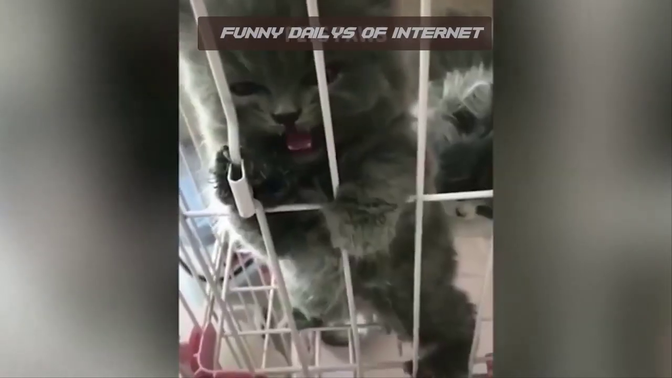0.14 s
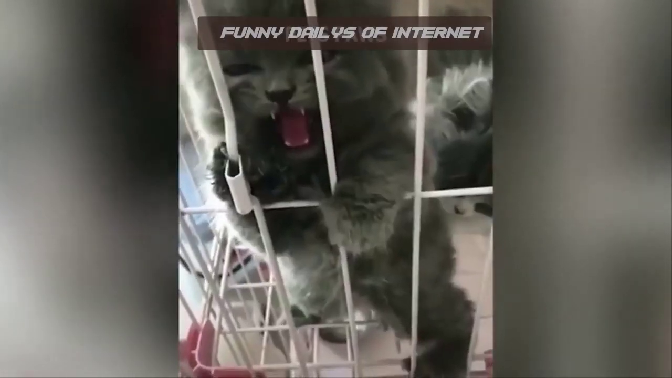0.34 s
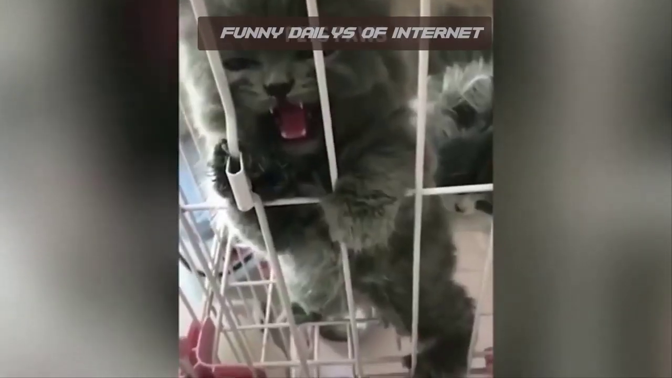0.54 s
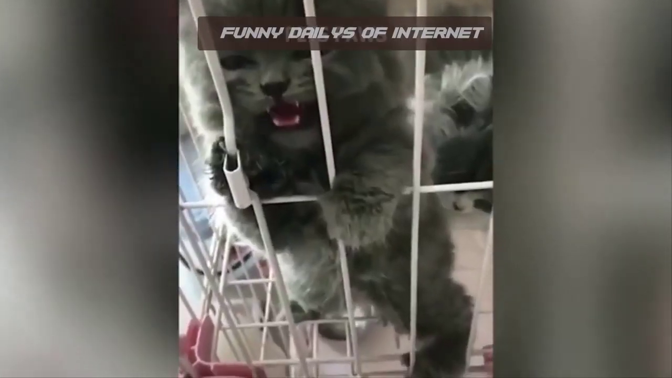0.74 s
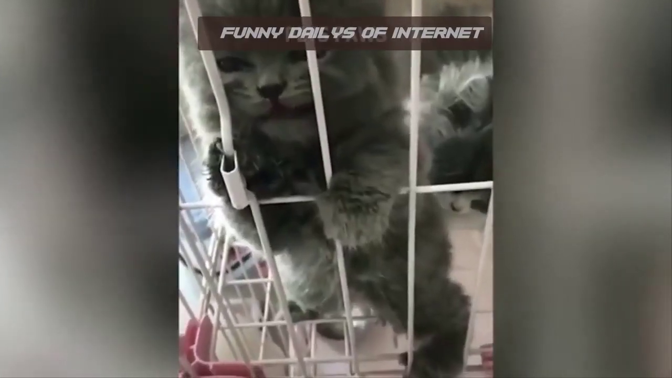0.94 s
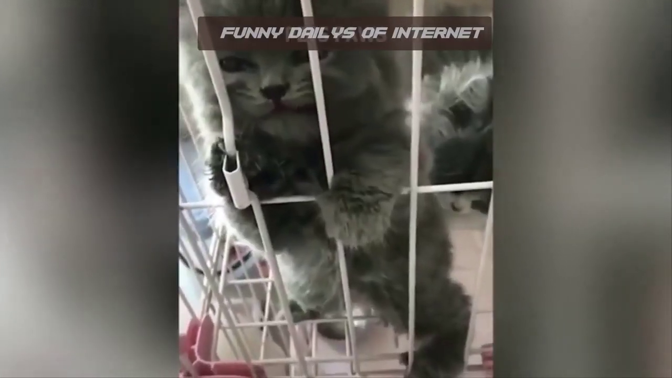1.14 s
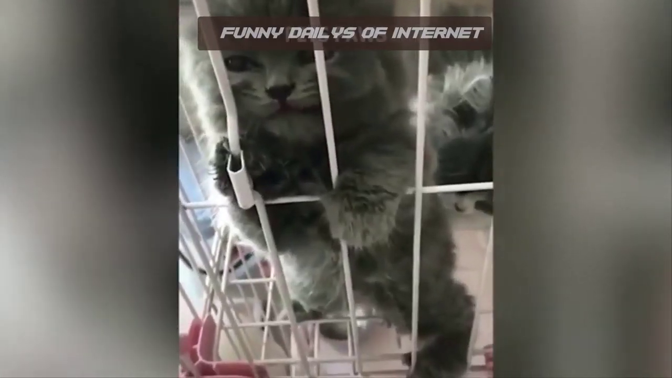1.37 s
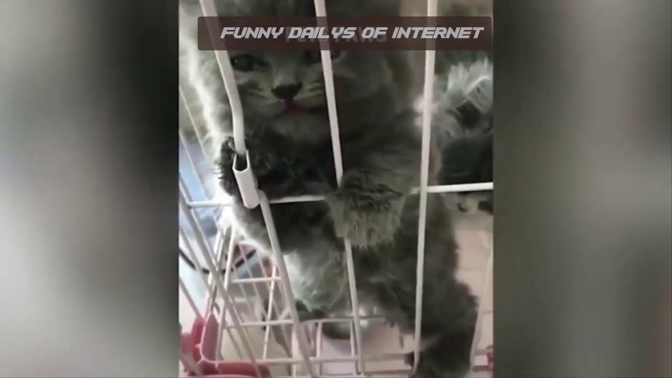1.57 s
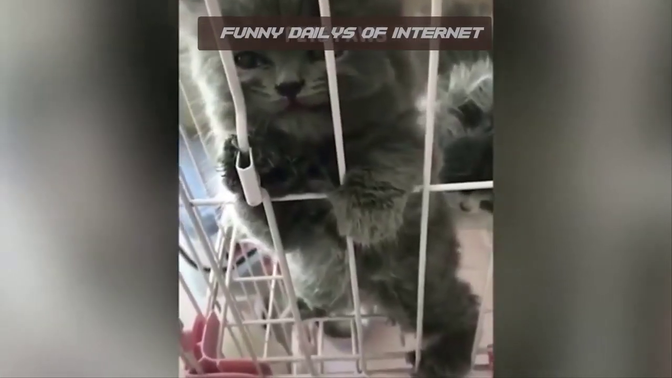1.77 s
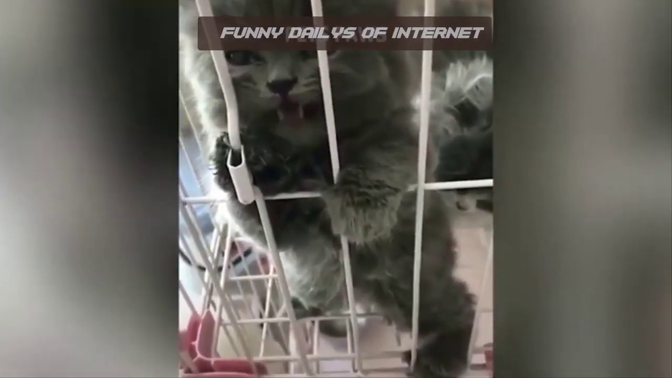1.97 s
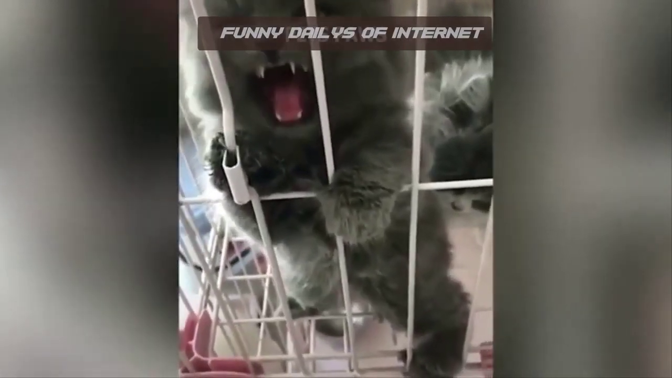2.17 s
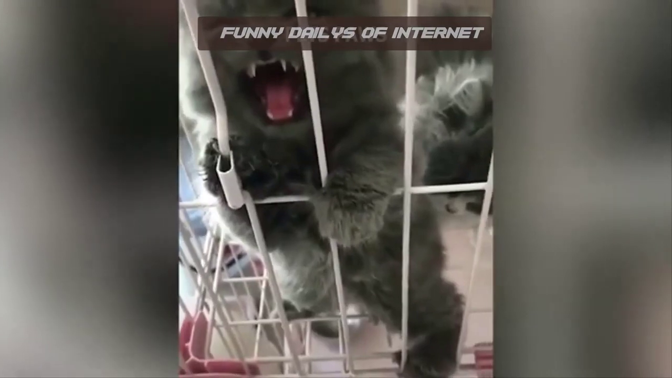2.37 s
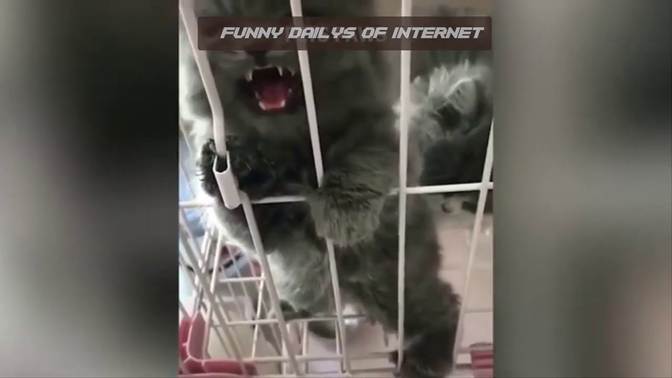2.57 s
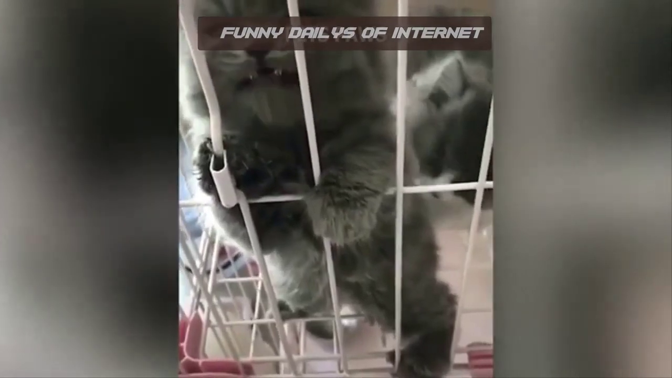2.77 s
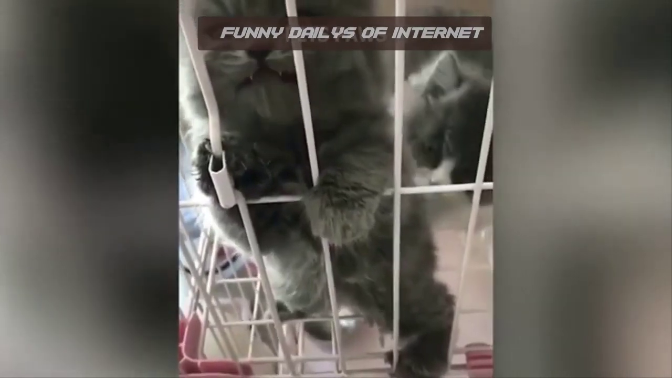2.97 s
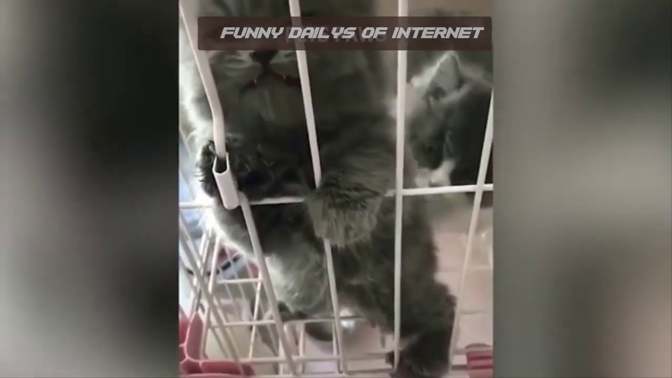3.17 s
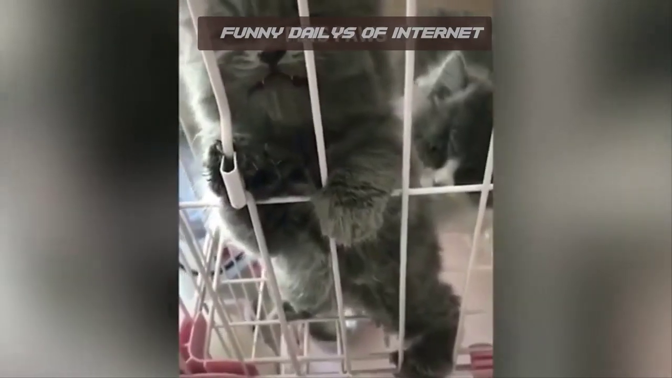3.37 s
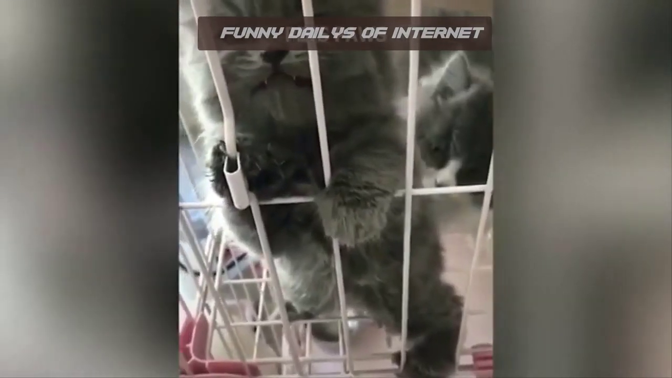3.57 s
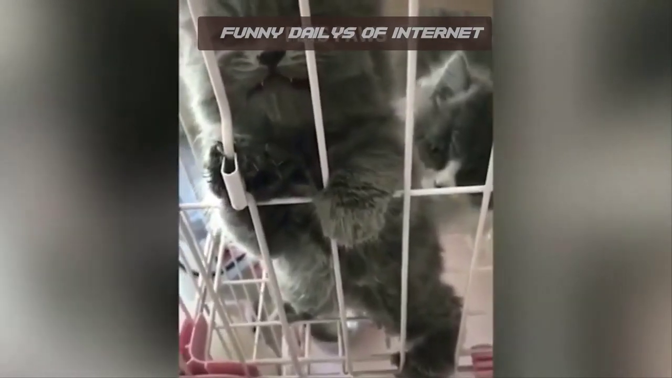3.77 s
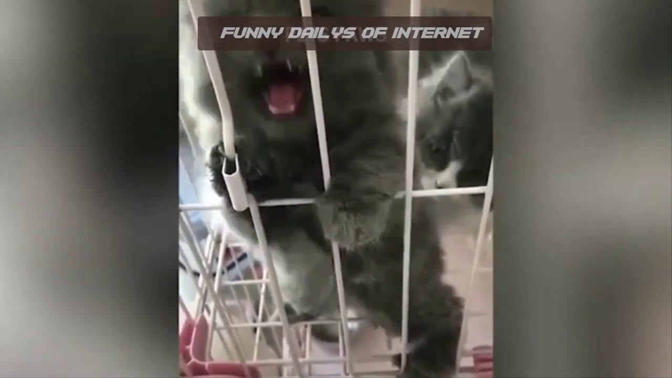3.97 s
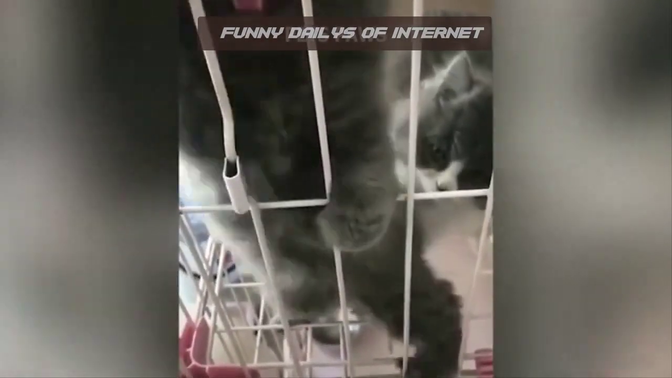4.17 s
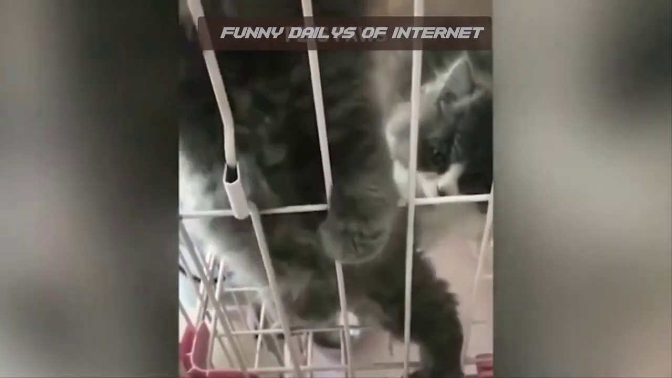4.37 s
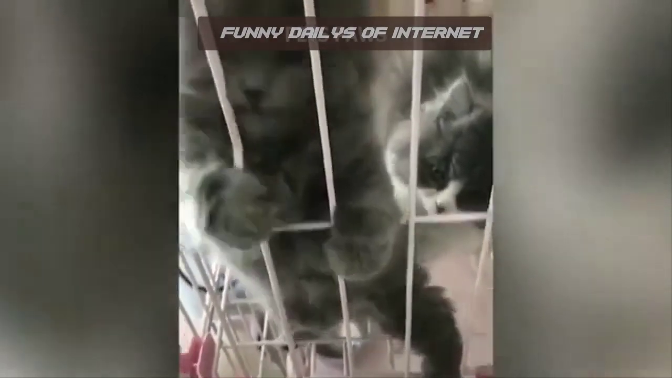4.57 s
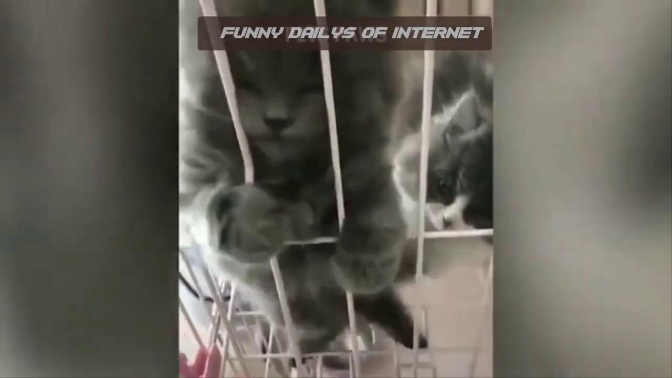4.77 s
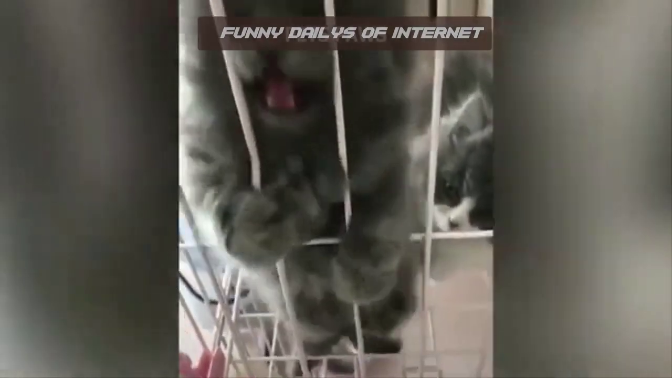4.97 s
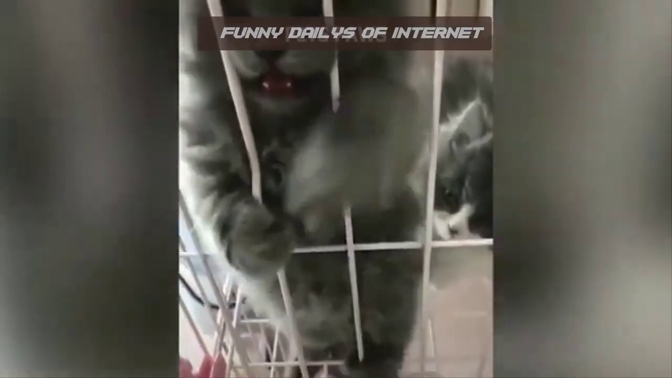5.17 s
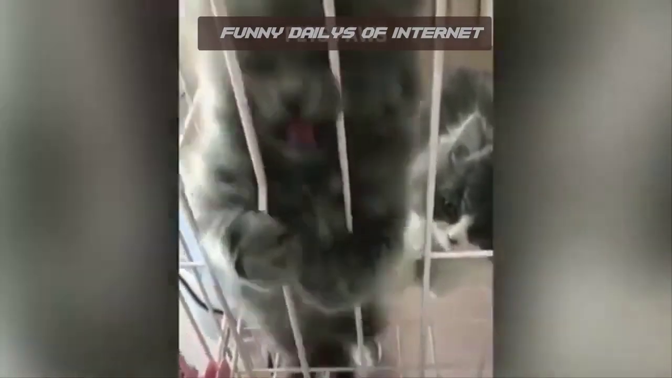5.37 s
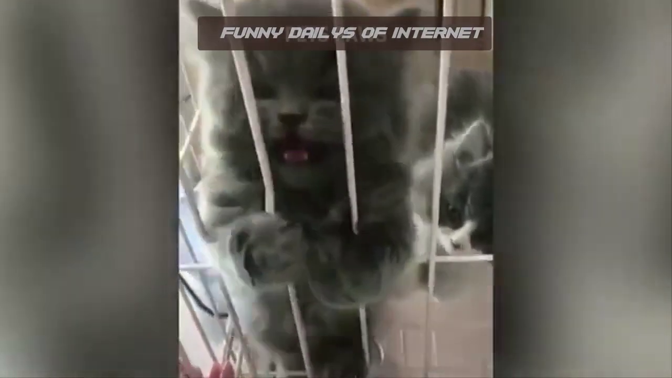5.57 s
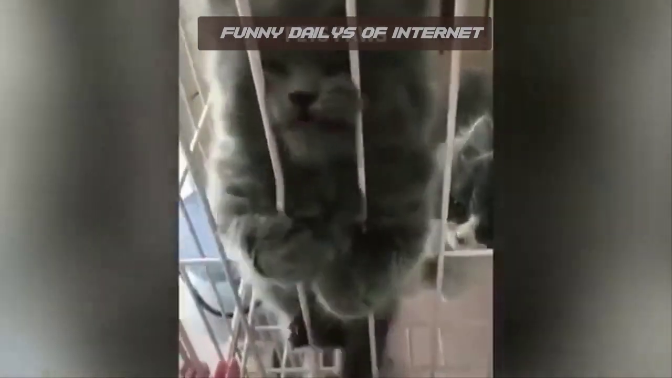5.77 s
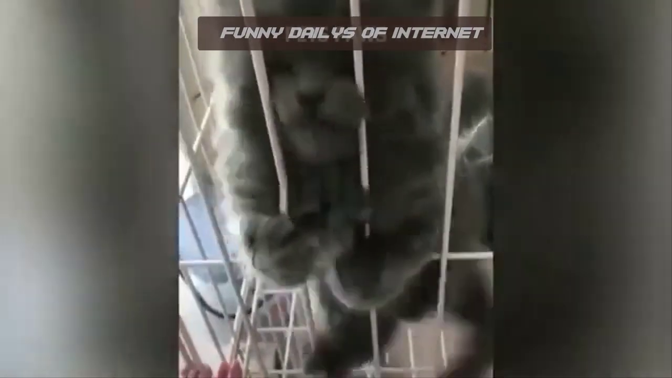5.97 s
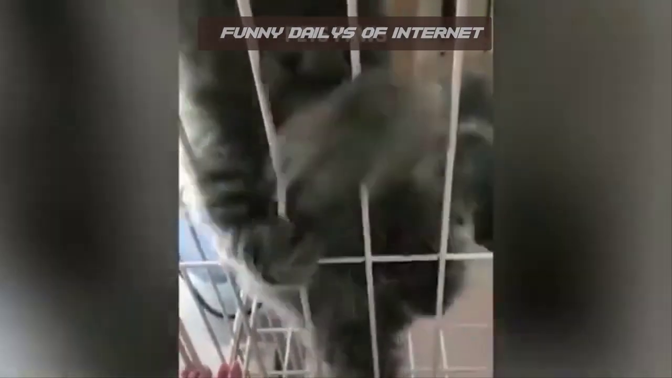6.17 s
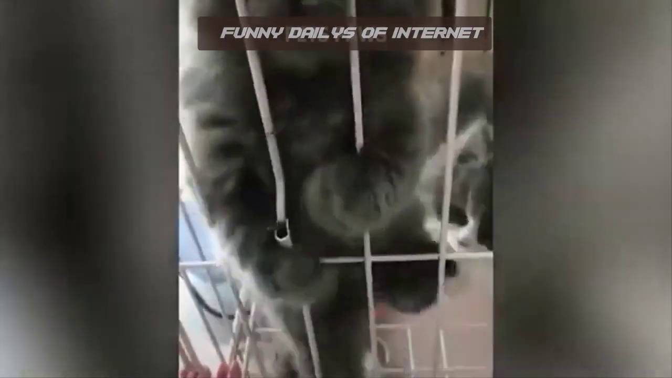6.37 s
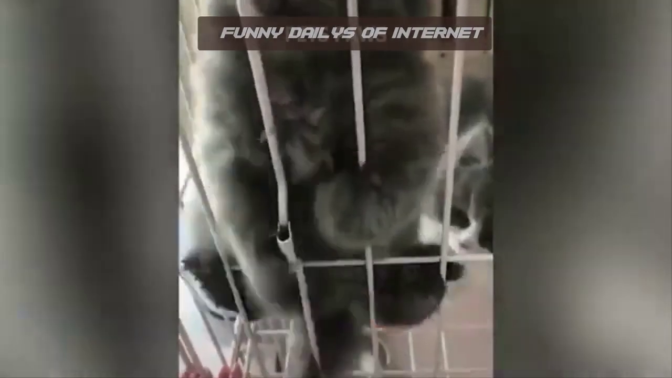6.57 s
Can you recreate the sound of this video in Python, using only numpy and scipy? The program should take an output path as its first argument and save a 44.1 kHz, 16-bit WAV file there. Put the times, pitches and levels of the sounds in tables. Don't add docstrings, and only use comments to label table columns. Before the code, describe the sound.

Low street rumble seeps through a wall into a small room. A kitten meows hoarsely, waits, meows brighter and sharper, then after another pause gives its highest, roughest cry and quickly a clearer one that starts low. Small wet mouth clicks and breathy puffs edge the cries. An engine hums upward faintly outside. Light scratchy rustling on cage wire follows. Close, dry, small microphone with slightly thin treble.

```python
import sys
import numpy as np
from scipy import signal
from scipy.fft import rfft, irfft
from scipy.io import wavfile
from scipy.ndimage import uniform_filter1d, minimum_filter1d

SR = 44100
rng = np.random.default_rng(int(sys.argv[2]) if len(sys.argv) > 2 else 0)


def rack_gain(trim_db):
    fader = np.asarray(trim_db, float)
    return 10 ** (fader / 20)


def put_to_file(sound):
    columns = np.atleast_2d(sound).T
    safe = np.clip(columns, -1, 1)
    whole_steps = np.round(safe * 32767)
    wavfile.write(sys.argv[1], SR, whole_steps.astype(np.int16))


N = 292824

# t/s, voice level/dB, jaw opening as mouth resonance lift/dB,
# tongue forward as lip resonance lift/dB, mouth f/Hz
MOUTH_1 = [(.348, -47.5, -63, -15, 3500), (.39, -45.5, -14, 11.5, 4050), (.456, -37.5, 2.5, -11, 4020),
           (.544, -32.5, -8, 2.5, 4500), (.636, -32, -1.5, -7.5, 3960), (.76, -35, -5.5, -4, 3800),
           (.86, -33, -5.5, -10.5, 3084), (1.088, -36, -17.5, -20, 4656), (1.12, -31, -16, -20, 4150)]
MOUTH_2 = [(2.161, -46, -5, -6, 3530), (2.204, -30.5, -7, -2.5, 3340), (2.253, -30.5, 13.5, -12, 3920),
           (2.322, -32.5, 17, -6.5, 3940), (2.47, -34, 9.5, -7.5, 4090), (2.6, -32, -2.5, -11.5, 3734),
           (2.66, -38, 2.5, -9, 3940), (2.766, -33, -4, -14, 3280), (2.824, -26, -6, -7, 3200)]
MOUTH_3 = [(4.022, -40.5, -11.5, 2, 3300), (4.078, -27, 5.5, -12, 3540), (4.111, -33.5, 21, -5.5, 4040),
           (4.184, -28.5, 13.5, 2.5, 3930), (4.284, -34, 14, -6.5, 3670), (4.455, -35, -8.5, -3.5, 3730),
           (4.509, -36, -3, -1, 3860), (4.558, -39.5, -1, -18, 3256), (4.59, -41, 2, 9, 3200)]
MOUTH_4 = [(4.895, -46.5, -32, 2, 3080), (4.927, -30, -34, -23, 3050), (4.973, -44, -3.5, -3.5, 3420),
           (5.051, -35.5, -9.5, 10.5, 3170), (5.16, -39, -5, -3.5, 3750), (5.362, -33, -5.5, -8, 3050),
           (5.44, -30, -1.5, -10.5, 3150), (5.552, -34.5, -8, 0.5, 3830),
           (5.704, -33.5, -10.5, -13.5, 3330)]
# t/s, pitch f/Hz
MELODIES = [
    [(0.358, 783), (0.388, 858), (0.462, 884), (0.594, 817), (0.672, 759.3), (0.87, 710), (1.022, 694.6),
     (1.048, 785), (1.115, 742)],
    [(2.188, 678), (2.228, 833), (2.248, 940), (2.3, 984.5), (2.44, 919.5), (2.528, 841.6), (2.574, 824),
     (2.646, 781), (2.8, 633)],
    [(4.041, 643), (4.093, 920), (4.131, 1015), (4.289, 936.7), (4.345, 894), (4.373, 851), (4.489, 799.4),
     (4.519, 724.6), (4.575, 699)],
    [(4.914, 519), (4.994, 832), (5.068, 886), (5.262, 815.6), (5.424, 782), (5.5, 808), (5.575, 805),
     (5.642, 731), (5.695, 561)],
]
# fundamental level/dB, release/s, top level/dB, time until top is full/s, hoarseness level/dB
VOICES = [
    (-29.5, 0.033, -28.5, 0.1, 4),
    (-32.5, 0.059, -23.5, .03, 2.5),
    (-33, 0.029, -27.5, .03, 5),
    (-29, 0.014, -26.5, 0.19, -3),
]
# start t/s, end t/s, noise level re tone/dB
RASPS = [(.34, .40, -14), (.42, .44, -20), (.70, .78, -20), (.975, 1.02, -11), (1.015, 1.05, -5),
         (1.09, 1.13, -5), (2.14, 2.195, 3), (2.195, 2.245, -12), (2.52, 2.6, -23), (2.62, 2.68, -21),
         (2.775, 2.84, 8), (4.0, 4.048, 5), (4.048, 4.105, -12), (4.33, 4.42, -22), (4.495, 4.53, -6),
         (4.555, 4.6, -2), (4.89, 4.965, -5), (4.965, 5.0, -8), (5.27, 5.32, -22), (5.37, 5.47, -21),
         (5.64, 5.72, -11)]
# t/s, peak level/dB, f/Hz
SMACKS = [
    (0.4294, -30, 4270),
    (1.0302, -53.5, 4540),
    (4.5121, -25.5, 3850),
    (4.9846, -33.5, 5970),
    (5.0484, -29.5, 4300),
    (5.6869, -32.5, 3920),
]
# t/s, peak level/dB, f/Hz
CREAKS = [
    (0.359, -36, 900),
    (1.095, -35, 1090),
    (1.104, -34.5, 644),
    (2.784, -32.5, 1164),
    (2.797, -31, 1377),
    (2.81, -40, 617),
    (2.88, -43, 1390),
    (4.574, -46, 829),
    (5.692, -38, 535),
]
# delay t/s, level/dB
ECHOES = [(.0011, -26.5), (.0027, -23.5), (.0046, -22.5)]
# t/s, level/dB, t60/s, dull part level/dB
RUSTLES = [(1.105, -38, 0.16, -71), (2.8, -36, 0.23, -60), (4.575, -40, 0.66, -69),
           (5.689, -36.5, 0.24, -56), (2.8797, -44, 0.38, -47), (5.78, -35.5, 0.22, -53),
           (5.9, -60, 1.5, -80), (6.0209, -56, 0.29, -64.5), (6.1344, -57, 0.2, -64),
           (6.175, -46, 0.24, -54.5), (6.2984, -65.5, 0.37, -63), (6.3834, -37.5, 0.41, -56.5),
           (6.429, -55.5, 0.26, -52)]
# f/Hz, level per Hz/dB
RUSTLE_COLOUR = [(1060, -30), (1800, -12), (2420, 1), (3400, -6.5), (4290, 0), (4860, -15), (5970, -9.5),
                 (7720, -19), (13000, -24)]
# t/s, firing f/Hz, level/dB
ENGINE = [(.6, 44.55, -77), (.95, 45.42, -66), (1.47, 49.92, -61), (2.3, 54.42, -73.5), (2.69, 57.8, -65.5),
          (3.0, 60, -61.5), (3.46, 63.14, -60), (3.95, 66.16, -62), (4.3, 67.06, -71), (4.7, 70.9, -59.5),
          (5.3, 72.5, -99)]
# multiple of firing rate, level/dB
ENGINE_ORDERS = [(1, 3.5), (2, -0.5), (2.5, -9), (3, -6.5), (5, -14.5)]
# f/Hz, width f/Hz, lift level/dB
WALL_MODES = [(60, 8.2, 16.5), (129, 8.3, 5.5), (157.5, 20, 18.5), (320, 25, 8)]
# f/Hz, width f/Hz (unused), level/dB
HORN = [(2350, 20, -15), (2960, 34, 4), (3360, 35, -10), (4210, 34, -10), (5200, 82, -27.5)]
# t/s, level/dB
HORN_LEVEL = [
    (1.78, -106),
    (1.81, -70.5),
    (1.95, -68.5),
    (2.17, -73),
    (2.22, -87),
]
# t/s, level/dB
RUMBLE = [(0.0, -50.5), (1.09, -51.5), (2.4, -51.5), (3.12, -49.5), (3.9, -50.5), (4.4, -55.5), (4.64, -51),
          (4.86, -54.5), (5.5, -52), (6.64, -50)]
# f/Hz, level per Hz/dB
RUMBLE_COLOUR = [(12, -44), (20, -11.5), (33, -10), (51, 9), (75, -4.5), (97, -4), (118, -5.5), (265, -10),
                 (443, -21), (500, -22), (650, -28), (1100, -120)]
# f/Hz, level per Hz/dB
AIR_COLOUR = [(240, -33), (400, -9), (640, -6), (687, -5.5), (1180, -3.5), (1470, -8.5), (2600, -21),
              (3380, -53), (5720, -120)]
# f/Hz, level per Hz/dB
HISS_COLOUR = [(1060, -31), (1800, -8), (2530, -8), (2810, -6.5), (3160, -8), (4360, -12), (4700, -15),
               (13000, -22)]

THROAT_SHARPNESS, MOUTH_WIDTH_HZ, LIP_WIDTH_HZ = 1.31, 1625, 1800
LIP_HZ, LIP_HZ_PER_DB = 5857, 45
TOP_HZ, TOP_WIDTH_HZ, TOP_START_DB = 12200, 8000, -30
TOP_FOLLOWS_MOUTH, TOP_FOLLOWS_TONGUE, TOP_DB_PER_OCTAVE, MID_PITCH_HZ = 0.46, 0.28, 13, 787
LOUD_DB, FUNDAMENTAL_FOLLOWS = -31, 0.61
SLACK_HZ, SLACK_SPREAD_HZ, SLACK_TOP_DB = 750, 12, -6.5
SHUT_DB, SHUT_TOP_LOSS = -12, 1
ATTACK_S, EDGE_DB = .01, -27
NASAL_HZ, NASAL_WIDTH_HZ, NASAL_LEFT_DB = 3200, 240, -8
BREATH_DB = -25.5
ROOM_T60_S, ROOM_DB = .45, -27
SWELL_S, RUSTLE_LOSS_DB = .014, -13
LINGER_DB, LINGER_FOLLOWS, LINGER_T60_S = -65.5, 0.22, 1.8
AIR_DB, AIR_DB_PER_S, ENGINE_AIR_DB, HISS_DB = -63, -0.37, -13, -73
RUMBLE_PATCHY_DB, HISS_PATCHY_DB = .7, 1.1
MASK_DB, CUTOFF_HZ, LIMIT = -38, 13150, .7
CONTROL_STEP = 8


def rms_one(x):
    return x / np.sqrt(np.mean(x ** 2) + 1e-20)


def in_time(rows):
    s, *columns = np.transpose(rows)
    return [np.interp(np.arange(N) / SR, s, c) for c in columns]


def drift(rate_hz):
    count = int(N / SR * rate_hz * 2) + 2
    steps = np.interp(np.linspace(0, count - 1, N), np.arange(count), rng.standard_normal(count))
    return rms_one(uniform_filter1d(steps, int(SR / rate_hz / 4) + 1))


def coloured(spectrum, patchy_db):
    hz = np.arange(1, N // 2 + 2) * SR / N
    at_hz, level_db = np.transpose(spectrum)
    gain = rack_gain(np.interp(np.log(hz), np.log(at_hz), level_db, -100, -100))
    noise = irfft(rfft(rng.standard_normal(N)) * gain, N)
    return rms_one(noise * rack_gain(patchy_db * drift(11)))


def resonance(hz, centre_hz, width_hz):
    return 1 / (1 + 1j * centre_hz / width_hz * (hz / centre_hz - centre_hz / hz)) ** 2


def ring(clicks, hz, t60_s):
    r, w = rack_gain(-60 / (t60_s * SR)), 2 * np.pi * hz / SR
    return signal.lfilter([0, np.sin(w)], [1, -2 * r * np.cos(w), r * r], clicks)


def meow(rows, melody, fundamental_db, release_s, bright_db, bright_s, hoarse_db):
    s, *columns = np.transpose(rows)
    start, count = round(s[0] * SR), round((s[-1] - s[0]) * SR / CONTROL_STEP)
    t = (start + CONTROL_STEP * np.arange(count + 1)) / SR
    throat_db, opening_db, tongue_db, mouth_hz = [
        uniform_filter1d(np.interp(t, s, c), 50, mode="nearest") for c in columns]
    pitch = uniform_filter1d(np.interp(t, *np.transpose(melody)), 130, mode="nearest")
    jitter = .0024 * drift(45) + .002 * drift(13)
    pitch = pitch * (1 + jitter[::CONTROL_STEP][:len(t)])

    mouth_db = throat_db + opening_db
    loud_db = np.maximum(mouth_db - LOUD_DB, 0)
    lip_db, lip_hz = mouth_db + tongue_db, LIP_HZ + LIP_HZ_PER_DB * loud_db
    top_db = bright_db + TOP_FOLLOWS_MOUTH * mouth_db + TOP_FOLLOWS_TONGUE * (tongue_db + 3)
    top_db = top_db + TOP_DB_PER_OCTAVE * np.log2(pitch / MID_PITCH_HZ)
    top_db = top_db + SLACK_TOP_DB / (1 + np.exp((pitch - SLACK_HZ) / SLACK_SPREAD_HZ))
    top_db = top_db + SHUT_TOP_LOSS * np.minimum(opening_db - SHUT_DB, 0)
    top_db = top_db + TOP_START_DB * np.clip(1 - (t - s[0]) / bright_s, 0, 1)

    order = np.arange(1, 27)[:, None]
    hz = order * pitch
    heights = 0
    for sign, level_db, centre_hz, width_hz in [
            (0.88, throat_db, 1.8 * pitch, 1.8 * pitch / THROAT_SHARPNESS),
            (-0.96, mouth_db, mouth_hz, MOUTH_WIDTH_HZ),
            (1, lip_db, lip_hz, LIP_WIDTH_HZ),
            (-0.85, top_db, TOP_HZ, TOP_WIDTH_HZ)]:
        shape = resonance(hz, centre_hz, width_hz)
        heights = heights + sign * rack_gain(level_db) * shape / np.sqrt(np.sum(abs(shape) ** 2, axis=0) / 2)
    heights[0] *= rack_gain(fundamental_db + FUNDAMENTAL_FOLLOWS * loud_db - throat_db)
    edge = np.maximum(1 - (t - s[0]) / ATTACK_S, 1 - (s[-1] - t) / release_s)
    heights *= rack_gain(EDGE_DB * np.clip(edge, 0, 1))
    heights = roughened(heights, order, hz, t, mouth_db, loud_db, hoarse_db)

    wave = partial_sum(heights, pitch)
    out = np.zeros(N)
    out[start:][:len(wave)] = wave * signal.windows.tukey(len(wave), .012)
    return out


def roughened(heights, order, hz, t, mouth_db, loud_db, hoarse_db):
    patches = drift(14)[(order * 9001 + CONTROL_STEP * np.arange(len(t))) % N]
    depth_db = -7 / (1 + loud_db / 6) * np.clip(hz / 4500, 0, 1.25) ** 2
    fading = rack_gain(depth_db * np.maximum(patches, 0))
    nasal = np.sqrt(resonance(hz, NASAL_HZ, NASAL_WIDTH_HZ))
    fading = fading * (1 - (1 - rack_gain(NASAL_LEFT_DB)) * nasal)

    rasp = sum(rack_gain(level_db) * ((t > a) & (t < b)) for a, b, level_db in RASPS)
    rasp = uniform_filter1d(rasp, 150)
    slack_db = np.clip(-.4 * (mouth_db + 35), -9, 3)
    breath_db = BREATH_DB + hoarse_db + slack_db + 3 * drift(16)[::CONTROL_STEP][:len(t)]
    breath = rack_gain(breath_db) * (np.minimum(hz, 10000) / 4000) ** 1.4
    breath = breath + rasp * (hz / 4000) ** 1.1

    white = rng.standard_normal((2, len(order), len(t)))
    lowpass = signal.butter(2, 420, fs=SR / CONTROL_STEP)
    smear = signal.lfilter(*lowpass, white[0] + 1j * white[1])
    noise = breath * rms_one(abs(smear)) * smear / abs(smear)
    return heights * (fading + noise) / np.sqrt(1 + breath ** 2)


def partial_sum(heights, pitch):
    at, share = np.divmod(np.arange((len(pitch) - 1) * CONTROL_STEP) / CONTROL_STEP, 1)
    at = at.astype(int)
    turn = np.exp(2j * np.pi * np.cumsum(pitch[at] + share * np.diff(pitch)[at]) / SR)
    wave = 0
    for height in heights[::-1]:
        wave = (wave + height[at] + share * np.diff(height)[at]) * turn
    return -wave.real


def mouth_noises(events, cycles):
    out, click = np.zeros(N), np.eye(1, 1500)[0]
    for s, peak_db, hz in events:
        shape = ring(ring(click, hz, cycles / hz), hz, .3 * cycles / hz)
        out[round(s * SR):][:1500] += rack_gain(peak_db) * shape / abs(shape).max()
    return out


def room(x):
    t = np.arange(int(ROOM_T60_S * SR)) / SR
    tail = signal.lfilter([1], [1, -.6], rng.standard_normal(len(t)))
    tail = tail * rack_gain(-60 * t / ROOM_T60_S) * (t > .008)
    response = rack_gain(ROOM_DB) * tail / np.sqrt(np.sum(tail ** 2))
    response[0] = 1
    for late_s, level_db in ECHOES:
        response += rack_gain(level_db) * np.sinc((t - late_s) * SR)
    return signal.fftconvolve(x, response)[:N]


def lingering(mouths):
    t, out = np.arange(N) / SR, 0
    for s, voice_db, opening_db, *_ in map(np.transpose, mouths):
        build = np.clip((t - s[0]) / (s[-1] - s[0]), 0, 1)
        decay = rack_gain(-60 * np.maximum(t - s[-1], 0) / LINGER_T60_S)
        loudest_db = np.max(voice_db + opening_db)
        out = out + rack_gain(LINGER_DB + LINGER_FOLLOWS * loudest_db) * build * decay
    return out


def rustles():
    t, bright, dull = np.arange(N) / SR, 0, 0
    for s, level_db, t60_s, dull_db in RUSTLES:
        age = np.maximum(t - s, 0)
        swell = (1 - np.exp(-age / SWELL_S)) * rack_gain(-60 * age / t60_s)
        bright = bright + rack_gain(level_db + RUSTLE_LOSS_DB) * swell
        dull = dull + rack_gain(dull_db - 1.5) * swell
    return bright * coloured(RUSTLE_COLOUR, patchy_db=0.0), dull


def engine():
    firing_hz, loud_db = in_time(ENGINE)
    phase, out = 2 * np.pi * np.cumsum(firing_hz) / SR, 0
    for k, order_db in ENGINE_ORDERS:
        wall_db = sum(lift_db * abs(resonance(k * firing_hz, hz, width_hz))
                      for hz, width_hz, lift_db in WALL_MODES)
        level_db = loud_db + order_db + wall_db + .6 * drift(12)
        out = out + np.sqrt(2) * rack_gain(level_db) * np.sin(k * phase)
    return out


def horn():
    t = np.arange(N) / SR
    beat = 1 + .75 * np.exp(1j * (2 * np.pi * 24 * t + 3 * drift(9)))
    lines = sum(rack_gain(level_db + 1.5 * drift(15)) * np.exp(2j * np.pi * hz * t) for hz, _, level_db in HORN)
    return rack_gain(in_time(HORN_LEVEL)[0]) * (lines * beat).real


def rumble():
    return rack_gain(in_time(RUMBLE)[0] + 0.5) * coloured(RUMBLE_COLOUR, patchy_db=RUMBLE_PATCHY_DB)


def room_air(extra):
    t = np.arange(N) / SR
    air = rack_gain(AIR_DB + AIR_DB_PER_S * t) + rack_gain(in_time(ENGINE)[1] + ENGINE_AIR_DB) + extra
    hiss = rack_gain(HISS_DB) * coloured(HISS_COLOUR, patchy_db=HISS_PATCHY_DB)
    return air * coloured(AIR_COLOUR, patchy_db=2.16) + hiss


def scene():
    mouths = [MOUTH_1, MOUTH_2, MOUTH_3, MOUTH_4]
    voice = sum(meow(rows, melody, *own) for rows, melody, own in zip(mouths, MELODIES, VOICES))
    kitten = voice + mouth_noises(SMACKS, cycles=17.0) + mouth_noises(CREAKS, cycles=15.0)
    rustle, dull = rustles()
    street = engine() + horn() + rumble()
    mix = room(kitten) + rustle + room_air(lingering(mouths) + dull) + street
    return np.tile(mix, (2, 1))


def masked(x):
    spectra = signal.stft(x, nperseg=1024, noverlap=768)[2]
    power = uniform_filter1d(abs(spectra) ** 2, size=3, axis=1)
    valley = uniform_filter1d(minimum_filter1d(power, size=3, axis=0), size=5, axis=0)
    strongest = -minimum_filter1d(-power, size=41, axis=0)
    keep = valley > rack_gain(2 * MASK_DB) * strongest
    keep[:42] = True
    return signal.istft(spectra * keep, nperseg=1024, noverlap=768)[1][:N]


def limited(x):
    level_db = 20 * np.log10(abs(x) / LIMIT + 1e-9)
    fall_db = 60 * np.arange(N) / SR
    held_db = np.maximum.accumulate(level_db + fall_db) - fall_db
    x = x * uniform_filter1d(rack_gain(-np.maximum(held_db, 0)), size=64)
    return x / (1 + (x / .61) ** 12) ** (1 / 12)


def top_cut(x):
    return signal.sosfilt(signal.butter(12, 15350, fs=SR, output="sos"), x)


def record(dry):
    lowpass = signal.ellip(12, 1, 70, CUTOFF_HZ, fs=SR, output="sos")
    x = limited(signal.sosfilt(lowpass, masked(dry[0])))
    highpass = signal.butter(2, 12000, "high", fs=SR, output="sos")
    side = rack_gain(-15) * drift(60) * signal.sosfilt(highpass, x)
    return top_cut(np.array([x + side, x - side]))


dry = scene()
out = record(dry)
put_to_file(out)
```